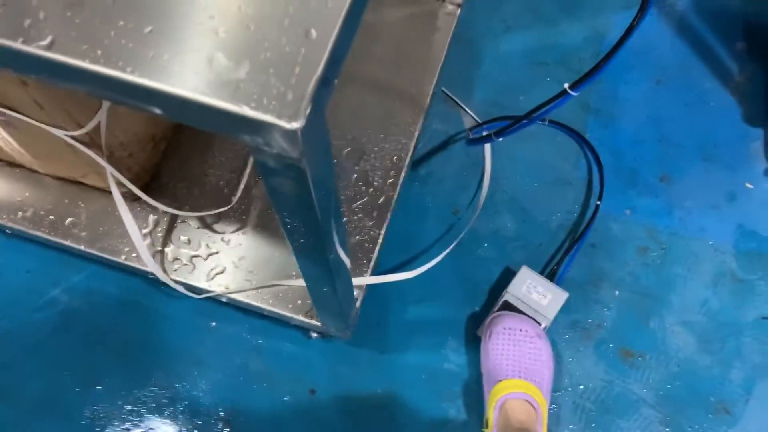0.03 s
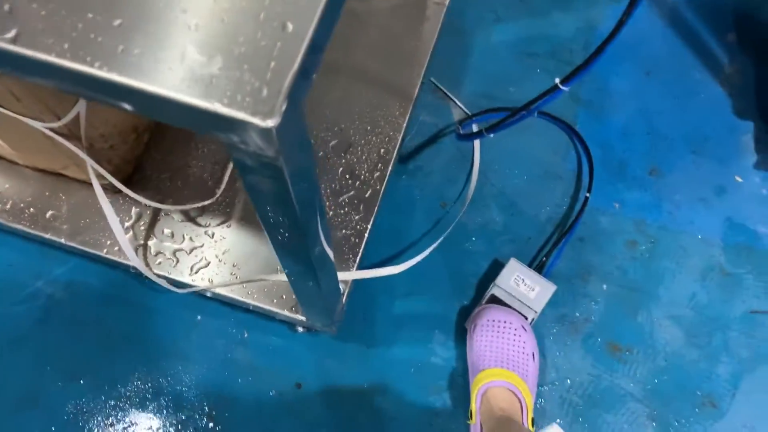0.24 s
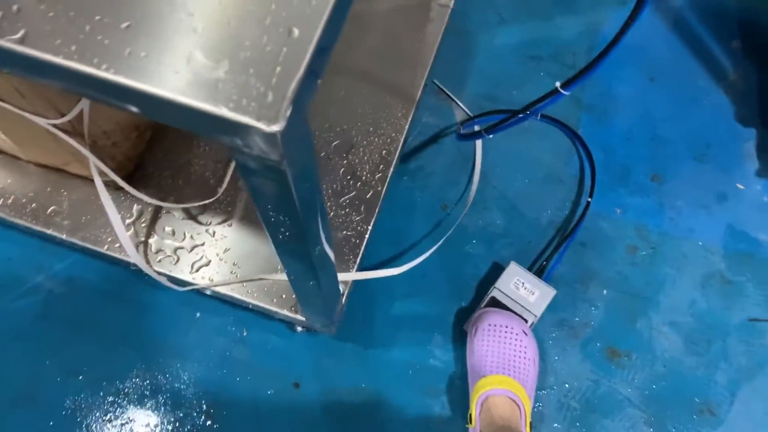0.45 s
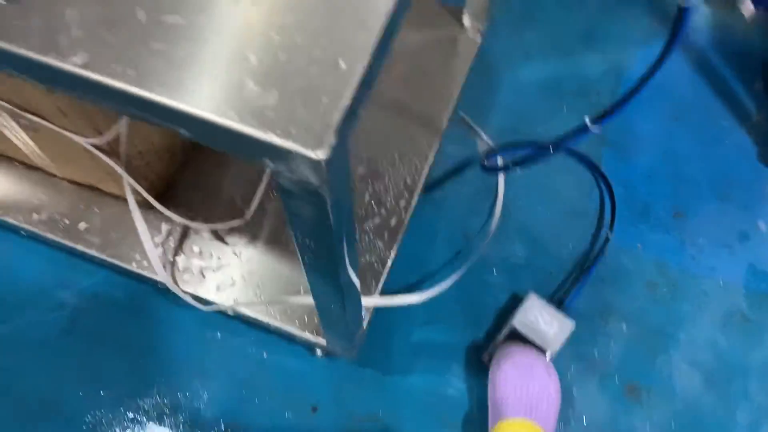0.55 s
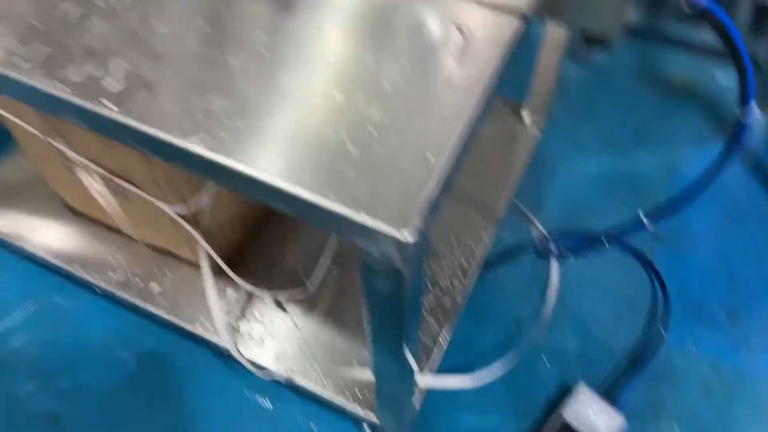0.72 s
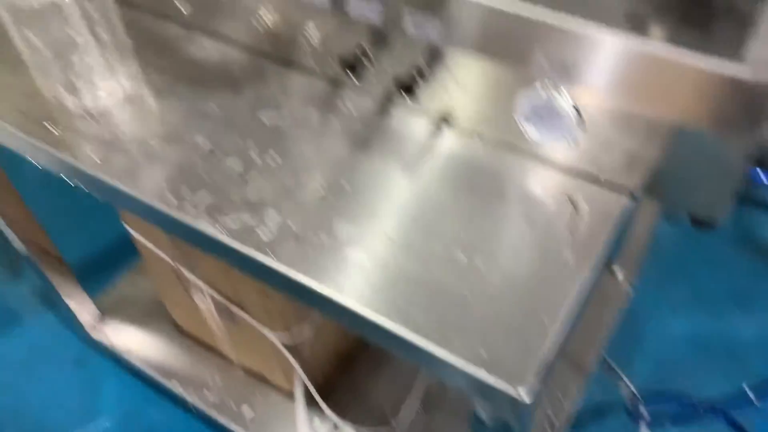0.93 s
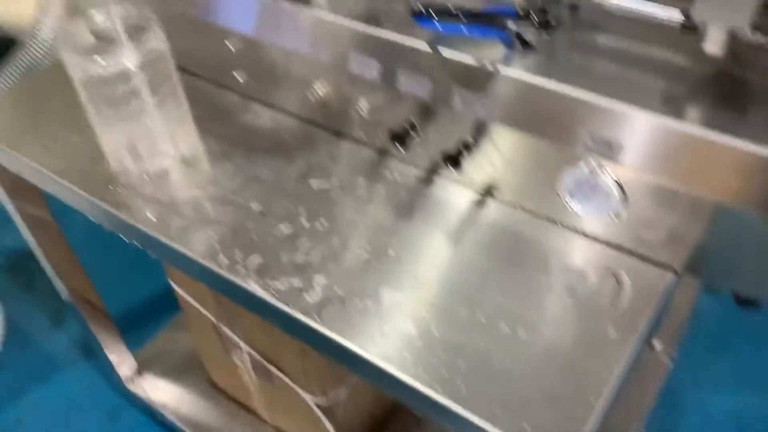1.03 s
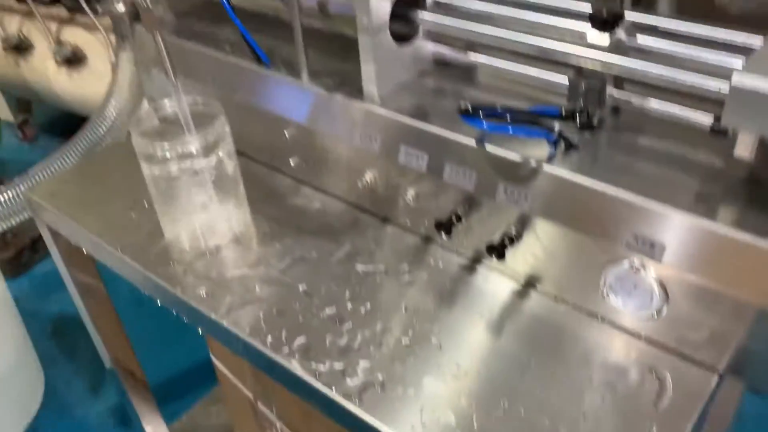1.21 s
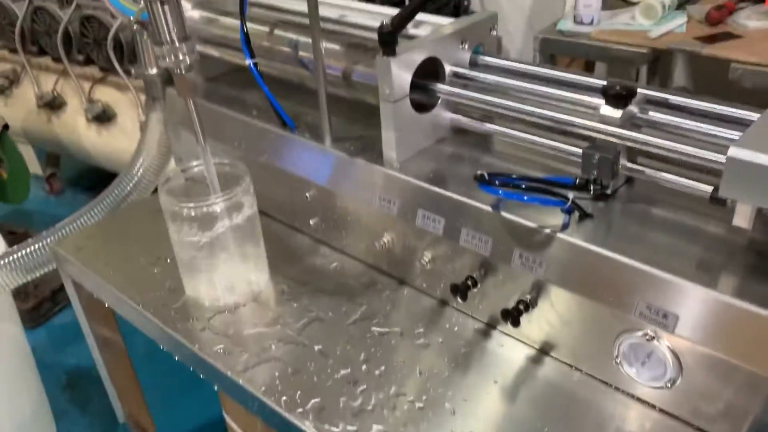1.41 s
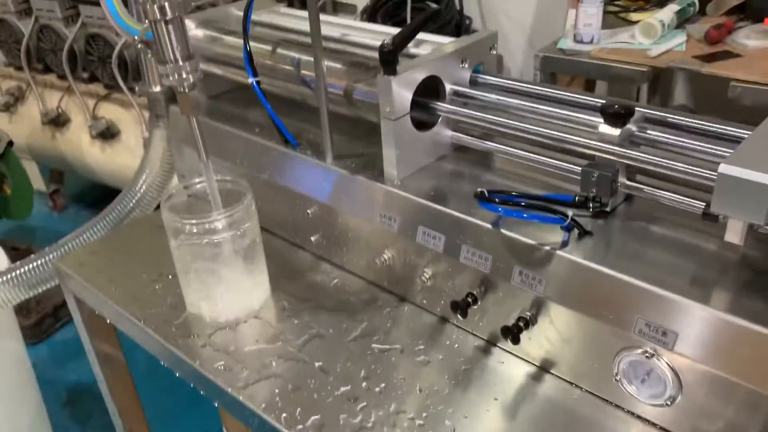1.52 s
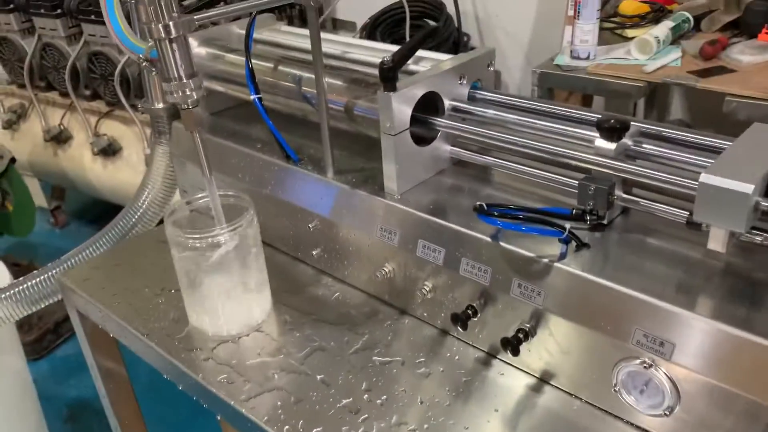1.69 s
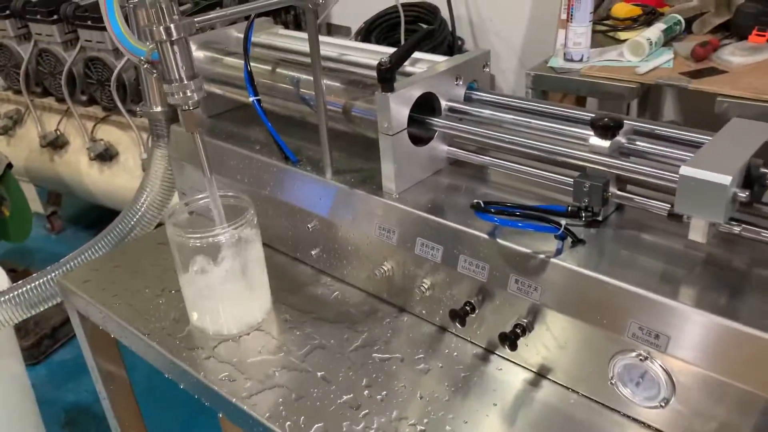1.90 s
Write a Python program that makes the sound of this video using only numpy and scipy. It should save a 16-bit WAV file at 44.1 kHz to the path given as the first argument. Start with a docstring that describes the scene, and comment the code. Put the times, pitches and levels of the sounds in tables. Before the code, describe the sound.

Pneumatic filling machine hisses and thumps, then liquid jets gurgling into a jar.

```python
"""A pneumatic filling machine runs one cycle in a workshop, picked up on a phone's two close-set mic ports.
Tripped by a pedal, the valve snaps and spits air; the piston thumps, rings the steel frame and groans
through its suction stroke while the exhaust hisses. The valve spits again as it reverses. Then a jet of
liquid rings an empty jar, and its hiss sinks as the jar fills, with gurgles, splashes and drops close by.
Steel panels throw back quick reflections; distant machines make the room tone."""
import sys
import numpy as np
from scipy import signal
from scipy.fft import rfft, irfft
from scipy.io import wavfile
from scipy.ndimage import uniform_filter1d

SR = 44100
rng = np.random.default_rng(int(sys.argv[2]) if len(sys.argv) > 2 else 0)


def pcm_store(signal):
    """Save signal as 16-bit PCM."""
    levels = np.round(np.clip(np.atleast_2d(signal), -1, 1) * 32767)
    wavfile.write(sys.argv[1], SR, levels.astype(np.int16).T)


N = 85995

# room tone of the workshop (frequency [Hz], level [dB])
SHOP_SPECTRUM = [(25, -22), (45, -32.5), (100, -30.5), (300, -34.5), (500, -40.5), (1000, -44.5),
                 (1600, -43.5), (3300, -52), (6500, -59.5), (11500, -54)]
# gain on room tone and frame ring, dipping after the blasts (time [s], level [dB])
SHOP_GAIN = [(0, 5), (.1, 3.5), (.5, 3.5), (.59, -19), (.72, -10), (.85, -1), (1.12, -3), (1.4, 0),
             (1.6, 3), (1.95, 2.5)]

# exhaust flow in the suction stroke (time [s], level [dB])
EXHAUST_LEVEL = [(.11, -30), (.17, 1), (.21, 1.5), (.262, 5), (.31, 1.5), (.38, 0.5), (.44, -2.5),
                 (.51, -2.5), (.562, 3), (.61, -4), (.67, -12), (.85, -11), (1.05, -20)]
# exhaust hiss (frequency [Hz], level [dB])
EXHAUST_SPECTRUM = [(200, -41.5), (700, -51), (1200, -34), (2000, -38), (2600, -27.5), (3300, -34),
                    (4200, -26), (5400, -26.5), (6500, -24.5), (7300, -34), (8500, -30), (10200, -20.5),
                    (11600, -45)]
# muffler resonances (frequency [Hz], width [Hz], level [dB])
MUFFLER_PEAKS = [(1546, 120, -30.5), (2450, 50, -38), (8700, 230, -22), (9150, 97, -21), (9240, 320, -27)]

# puffs through the valve body (time [s], rise [dB/s], hold [s], fall [dB/s], level [dB], low edge [Hz])
RUSH_PUFFS = [(0.185, 451, 0.027, 750, 1.5, 870), (0.525, 2806, 0.008, 452, -1, 1200),
              (0.566, 300, 0.0059, 240, -3, 1230)]
# resonances of the hollow body (frequency [Hz], width [Hz], level [dB])
VALVE_BODY_PEAKS = [(1030, 65, -14), (1294, 250, -11.5), (1530, 140, -17.5)]
# tilt of the rush (frequency [Hz], level [dB])
RUSH_TILT = [(550, 13), (950, 1), (1620, -4), (1850, -9.5)]
# snaps of the valve (time [s], level [dB])
VALVE_SNAPS = [(.1875, -12), (.221, -5), (0.5248, -2)]
# crack of a snap (frequency [Hz], level [dB])
CRACK_SPECTRUM = [(600, -35), (1400, -17.5), (2200, -24), (3200, -15), (6200, -21), (7200, -26),
                  (8200, -11), (11000, -6)]
# modes of the valve's metal (frequency [Hz], level [dB], t60 [s])
VALVE_METAL_MODES = [(1350, -35, .06), (1606, -33, 0.057), (2940, -36, .1), (3410, -37, .1),
                     (3610, -25.5, 0.19), (5640, -33, 0.086)]
# air blasts from the valve (peak time [s], rise [dB/s], fall [dB/s], level [dB])
VALVE_BLASTS = [(0.192, 440, 383, 0.5), (0.223, 1490, 600, -9.5), (0.524, 2000, 284, 0),
                (0.542, 1202, 1400, -11.5)]
# hiss of a blast (frequency [Hz], level [dB])
BLAST_SPECTRUM = [(300, -48), (800, -38), (2000, -29), (2600, -20.5), (3300, -14), (4200, -20.5),
                  (5400, -9.5), (6500, -18.5), (7300, -23), (8000, -4.5), (8700, -11.5), (9300, -11),
                  (10300, -8), (11600, -4)]

PISTON_START_S = .197
# knocks of the piston on the frame (time [s], level [dB])
PISTON_KNOCKS = [(0.197, -2.5), (0.254, -13), (0.524, -28)]
# modes of the steel frame (frequency [Hz], level [dB], t60 [s])
FRAME_MODES = [(56.7, -31.5, 0.73), (97, -24.5, 0.36), (140, -59, 0.26), (182.8, -36.5, 0.42),
               (243, -25.5, 0.12), (406, -38, 0.32), (436.7, -23, 0.11), (447, -35, 0.58), (556, -50, 0.22)]
# rumble of the sliding piston (frequency [Hz], level [dB])
SLIDE_SPECTRUM = [(30, -21), (60, -20.5), (130, -15), (330, -29.5), (450, -13), (600, -33.5), (880, -22.5),
                  (1300, -36), (3000, -71.5)]
# groan of the piston seal (time [s], pitch [Hz], level [dB])
SEAL_GROAN = [(.21, 295, -92), (.24, 297, -40.5), (.279, 293.8, -20.5), (.3, 286.6, -34), (.36, 286.3, -36),
              (.41, 276, -46.5), (.47, 284.5, -46), (.52, 291, -47), (.57, 286, -86)]
# low bumps (time [s], level [dB])
LOW_BUMPS = [(.535, 0), (1.154, 1)]
# body of a bump (frequency [Hz], level [dB])
BUMP_SPECTRUM = [(35, -24), (80, -20), (140, -24.5), (300, -45), (1000, -68)]

# strength of the jet (time [s], level [dB])
JET_LEVEL = [(.5, -58), (.6, 5), (.7, -3), (.79, -4), (.95, -1), (1.12, 0), (1.21, -0.5), (1.33, -2.5),
             (1.46, -1), (1.55, -1), (1.67, -4), (1.8, -5.5), (1.95, -6.5)]
# hiss of the jet (frequency [Hz], level [dB])
JET_SPECTRUM = [(500, -49), (1200, -42), (2000, -46.5), (3300, -39.5), (4300, -38), (5000, -43.5),
                (6300, -39.5), (7300, -57), (8500, -54), (10300, -42), (11600, -59)]
# centre of the jet's band, sinking as the jar fills (time [s], frequency [Hz])
JET_CENTRE = [(.7, 5370), (1.05, 5043), (1.2, 4746), (1.45, 3995), (1.6, 3742), (1.95, 3197)]
# jar modes under the jet (frequency [Hz], width [Hz], level [dB])
JAR_PEAKS = [(1171, 7.4, -22), (1880, 62, -28), (2636, 30, -21), (3140, 120, -30), (3900, 260, -27.5),
             (4223, 103, -23), (4655, 112, -25.5), (5220, 320, -29.5)]
# fizz of the spray (time [s], level [dB])
SPRAY_LEVEL = [(.7, -62.5), (.82, -47.5), (1.1, -51.5), (1.4, -52), (1.57, -50.5), (1.7, -51.5),
               (1.95, -50)]
# gurgle in the jar (time [s], level [dB])
GURGLE_LEVEL = [(.75, -101), (1.0, -55), (1.15, -53), (1.28, -49.5), (1.42, -55), (1.5, -39), (1.58, -47),
                (1.75, -47.5), (1.95, -47.5)]
# resonances of the air above the liquid (frequency [Hz], width [Hz], level [dB])
JAR_AIR_PEAKS = [(443, 110, -1.5), (559, 70, 1)]
# drops landing on steel (time [s], level [dB])
DROP_HITS = [(1.021, 2), (1.071, -17), (1.308, 1.5), (1.393, 0), (1.466, 5), (1.486, 4.5), (1.553, 3.5),
             (1.567, 5), (1.675, 1.5), (1.687, 1), (1.723, -4.5), (1.914, 1)]
# tick of a drop (frequency [Hz], level [dB])
DROP_SPECTRUM = [(600, -48), (2000, -39), (4500, -45), (6500, -36.5), (8200, -35), (11500, -32)]
# single large bubbles (peak time [s], pitch [Hz], level [dB])
GLUG_BUBBLES = [(1.218, 517, -44), (1.243, 516, -44), (1.462, 529, -41.5), (1.502, 514, -35),
                (1.531, 526, -35.5), (1.56, 504, -41.5), (1.62, 492, -40), (1.651, 467, -42.5),
                (1.694, 550.6, -39), (1.749, 482, -39.5), (1.773, 559, -41), (1.872, 546, -44)]
# splashes in the jar (time [s], level [dB])
SPLASH_BURSTS = [(1.385, -3), (1.56, -2.5), (1.629, -2.5), (1.77, -21)]

# how alike the two mic ports sound (frequency [Hz], likeness [0-1])
PORT_LIKENESS = [(100, 0.99), (300, 0.9), (600, 0.34), (900, 0.1), (1400, 0.2), (2200, 0.08), (4500, 0.15),
                 (5800, 0), (7000, 1), (8500, 1)]
# left port minus right port (frequency [Hz], level [dB])
PORT_BALANCE = [(150, 0), (300, -2), (520, -1.5), (900, 0.5), (3000, -0.5), (4400, -2.5), (5400, -4),
                (6300, -0.5), (7200, 0)]


def undb(db):
    """Decibels to gain."""
    return 10 ** (np.asarray(db) / 20)


def clock():
    """Time of every sample."""
    return np.arange(N) / SR


def curve(rows, column=1):
    """A table's column joined by straight lines in time."""
    rows = np.array(rows)
    return np.interp(clock(), rows[:, 0], rows[:, column])


def unit(x):
    """Scale to rms 1."""
    return x / np.sqrt(np.mean(x ** 2))


def noise():
    """Unrelated white noise at each mic port."""
    return rng.standard_normal((2, N))


def waver(rate_hz):
    """Smooth random motion, rms 1."""
    span = max(int(SR / rate_hz), 2)
    return unit(uniform_filter1d(uniform_filter1d(rng.standard_normal(N), span), span))


def bins():
    """Frequency of every spectral line."""
    return np.maximum(np.arange(N // 2 + 1) * SR / N, 1)


def across(rows):
    """A table joined by straight lines over log frequency."""
    rows = np.array(rows)
    return np.interp(np.log(bins()), np.log(rows[:, 0]), rows[:, 1])


def colour(x, spectrum):
    """Filter by points (frequency [Hz], level [dB])."""
    return irfft(rfft(x) * undb(across(spectrum)), N)


def low_cut(x, hz, order):
    """Butterworth high-pass."""
    return signal.sosfilt(signal.butter(order, hz, "high", fs=SR, output="sos"), x)


def resonate(x, peaks):
    """Parallel resonances (frequency [Hz], width [Hz], level [dB])."""
    gain = sum(undb(db) / (1 + 1j * (bins() / hz - hz / bins()) * hz / width) for hz, width, db in peaks)
    return irfft(rfft(x) * gain, N)


def ring(at, modes):
    """Decaying modes struck at one moment."""
    age = np.maximum(clock() - at, 0)
    return sum(undb(db) * np.sin(2 * np.pi * hz * age) * undb(-60 * age / t60) for hz, db, t60 in modes)


def swell(at, rise, fall, hold_s=0):
    """Envelope that reaches 1 at a time [s], holds and dies; rise and fall in dB/s."""
    t = clock() - at
    return undb(np.maximum(np.minimum(t, 0) * rise - np.maximum(t - hold_s, 0) * fall, -200))


def pan(db):
    """Gains of the two ports for a left-minus-right level."""
    return undb(np.array([[db], [-db]]) / 2)


def drifting_band(hz, width_hz):
    """Noise in a resonance whose centre moves."""
    a, b = (irfft(rfft(noise()) / (1 + (2 * bins() / width_hz) ** 2), N) for _ in range(2))
    phase = 2 * np.pi * np.cumsum(hz) / SR
    return np.sqrt(2) * (a * np.cos(phase) + b * np.sin(phase))


def bubbles(per_s, centre_hz, spread, cycles, scatter_db, glide=0.013):
    """A random stream of bubbles, each a short ring rising in pitch; rms 1."""
    stream = np.zeros((2, N + SR))
    for when, pitch, size, left_phase, right_phase in rng.random((int(per_s * N / SR), 5)):
        hz = min(centre_hz * (pitch / (1 - pitch)) ** (spread / 2), SR / 3)
        age = np.arange(min(int(4 * cycles * SR / hz), SR)) * hz / SR  # in cycles
        turns = age * (1 + glide * age / cycles) + np.array([[left_phase], [right_phase]])
        envelope = np.exp(-age / cycles) * (1 - np.exp(-2 * age))
        gain = undb(-scatter_db * np.log(1 - size))
        start = int(when * N)
        stream[:, start:start + len(age)] += gain * envelope * np.sin(2 * np.pi * turns)
    return unit(stream[:, :N])


def room_tone(waver_db=0.43):
    """Dull wash of machines far off in the workshop."""
    return colour(noise(), SHOP_SPECTRUM) * undb(curve(SHOP_GAIN) + waver_db * waver(11))


def exhaust(rough_db=1.14, treble_hz=7700, treble_power=0.62):
    """Air leaves through the muffler, duller as the pressure drops."""
    flow = undb(curve(EXHAUST_LEVEL))
    hiss = colour(noise(), EXHAUST_SPECTRUM) + resonate(noise(), MUFFLER_PEAKS)
    air = hiss * flow * undb(rough_db * waver(120))
    treble = irfft(rfft(air) / (1 + (treble_hz / bins()) ** 8), N)
    return air + treble * (flow ** treble_power - 1)  # treble grows faster than the flow


def valve_rush(flutter_db=1.5):
    """Air flutters through the hollow valve body, thinner on the return stroke; centred on the mic."""
    air = 0
    for at, rise, hold_s, fall, db, edge_hz in RUSH_PUFFS:
        puff = rng.standard_normal(N) * undb(db) * swell(at, rise, fall, hold_s)
        air = air + low_cut(puff, edge_hz, order=6)
    air *= undb(flutter_db * waver(71))
    return colour(resonate(air, VALVE_BODY_PEAKS), RUSH_TILT) * pan(db=0)


def valve_clack():
    """The valve snaps over as the piston starts and reverses: a sharp crack and a short metal ring."""
    crack = sum(undb(db) * (clock() > at) * swell(at, rise=0, fall=1500) for at, db in VALVE_SNAPS)
    metal = sum(undb(db) * ring(at, VALVE_METAL_MODES) for at, db in VALVE_SNAPS)
    return colour(noise() * crack, CRACK_SPECTRUM) + metal


def valve_blasts(rough_db=1.5):
    """Each switch of the valve spits a bright, sputtering blast."""
    envelope = sum(undb(db) * swell(at, rise, fall) for at, rise, fall, db in VALVE_BLASTS)
    return colour(noise() * envelope * undb(rough_db * waver(260)), BLAST_SPECTRUM)


def piston_thump(from_hz=252, to_hz=81, glide_s=0.0093, decay_s=0.0075):
    """The piston starts with a thump that falls in pitch."""
    age = np.maximum(clock() - PISTON_START_S, 0)
    hz = to_hz + (from_hz - to_hz) * np.exp(-age / glide_s)
    phase = 2 * np.pi * np.cumsum(hz * (age > 0)) / SR
    return -undb(-14) * np.sin(phase) * np.exp(-age / decay_s)


def frame_ring():
    """The piston's knocks ring the steel frame."""
    return sum(undb(db) * ring(at, FRAME_MODES) for at, db in PISTON_KNOCKS) * undb(curve(SHOP_GAIN))


def piston_slide(attack_s=0.017):
    """After its thump the sliding piston rumbles and dies away."""
    attack = np.clip((clock() - PISTON_START_S) / attack_s, 0, 1)
    fade = swell(PISTON_START_S, rise=0, fall=105, hold_s=0.068)
    return colour(noise() * attack * fade, SLIDE_SPECTRUM)


def piston_seal(jitter=0.0245, overtone_db=-27, waver_db=1.3):
    """The dragging seal groans unsteadily, a little right of centre."""
    hz = curve(SEAL_GROAN) * (1 + jitter * waver(105))
    phase = 2 * np.pi * np.cumsum(hz) / SR
    tone = np.sin(phase) + undb(overtone_db) * (np.sin(2 * phase) + np.sin(3 * phase))
    return unit(tone) * undb(curve(SEAL_GROAN, column=2) + waver_db * waver(46)) * pan(db=-3.5)


def bumps():
    """Soft low bumps as the piston reverses and during the pour."""
    envelope = sum(undb(db) * swell(at, rise=153, fall=550) for at, db in LOW_BUMPS)
    return colour(noise() * envelope, BUMP_SPECTRUM)


def jet(landing_s=0.783, flicker_db=0.7):
    """The jet hisses; its landing rings the whole jar, then its sinking band passes from mode to mode."""
    flow = undb(curve(JET_LEVEL) + flicker_db * waver(27))
    landing = undb(-1.5) * swell(landing_s, rise=150, fall=35, hold_s=0.072)
    drive = drifting_band(curve(JET_CENTRE), width_hz=1350) * flow + noise() * landing
    return colour(noise(), JET_SPECTRUM) * flow + resonate(drive, JAR_PEAKS)


def spray():
    """Small bubbles fizz under the jet."""
    fizz = bubbles(per_s=2300, centre_hz=3170, spread=0.66, cycles=4.6, scatter_db=1.2)
    return fizz * undb(curve(SPRAY_LEVEL))


def gurgle():
    """Large bubbles resonate in the air above the liquid."""
    churn = bubbles(per_s=420, centre_hz=496.7, spread=0.17, cycles=4.2, scatter_db=-0.5)
    return resonate(churn, JAR_AIR_PEAKS) * undb(curve(GURGLE_LEVEL))


def drops():
    """Stray drops tick on the steel close to the mic."""
    ticks = sum(undb(db) * swell(at, rise=15000, fall=1500) for at, db in DROP_HITS)
    return colour(noise() * ticks, DROP_SPECTRUM)


def glugs():
    """Single large bubbles swell and ring in the jar, a little right of centre."""
    rings = sum(undb(db) * swell(at, rise=1103.5, fall=603) * np.sin(2 * np.pi * hz * (clock() - at))
                for at, hz, db in GLUG_BUBBLES)
    return rings * pan(db=-3.5)


def splashes():
    """The jet throws up short clusters of bubbles."""
    bursts = sum(undb(db) * swell(at, rise=714, fall=357) for at, db in SPLASH_BURSTS)
    froth = bubbles(per_s=1500, centre_hz=2225, spread=0.87, cycles=3.8, scatter_db=2.5)
    return froth * bursts * undb(-44)


def reflections(x, steel_decay_s=0.005, tail_t60_s=0.1):
    """Quick slap off nearby steel panels, then the workshop's short tail; the bass stays dry."""
    t = clock()
    steel = noise() * np.exp(-t / steel_decay_s) * (t > .001)
    tail = noise() * undb(-60 * t / tail_t60_s) * (t > .01)
    response = (undb(-2) * unit(steel) + undb(-7) * unit(tail)) / np.sqrt(N)
    return signal.fftconvolve(x, low_cut(response, hz=1500, order=2), axes=1)[:, :N]


def mic_ports(x, lag_s=0.0002198, lag_above_hz=5500):
    """The two ports hear bass and top treble alike; the treble reaches the left one later."""
    shared, apart = rfft(x)
    likeness = np.clip(across(PORT_LIKENESS), 0, 1)
    mid = shared * np.sqrt((1 + likeness) / 2)
    side = apart * np.sqrt((1 - likeness) / 2)
    lag = np.exp(-2j * np.pi * bins() * lag_s * (bins() > lag_above_hz))
    lean = undb(across(PORT_BALANCE) / 2)
    return irfft(np.array([(mid + side) * lag * lean, (mid - side) / lean]), N)


def scene(spit_send_db=-7):
    """Machine, jar and workshop as heard from the phone's position."""
    rush = valve_rush()
    spit = valve_clack() + valve_blasts()
    flow = exhaust() + jet() + spray() + gurgle()
    echo = reflections(flow + rush + spit * undb(spit_send_db))
    spread = room_tone() + flow + spit + echo + piston_slide() + bumps() + drops() + splashes()
    direct = rush + piston_thump() + frame_ring() + piston_seal() + glugs()  # in phase at both ports
    return mic_ports(spread) + direct


def record(dry, low_hz=42, top_hz=11100):
    """The phone cuts the deep bass and the top."""
    top_cut = signal.ellip(10, .2, 80, top_hz, fs=SR, output="sos")
    return signal.sosfilt(top_cut, low_cut(dry, low_hz, order=4))


dry = scene()
out = record(dry)
pcm_store(out)
```